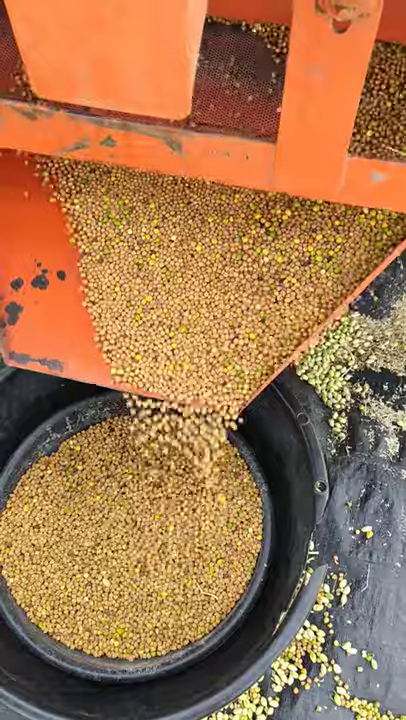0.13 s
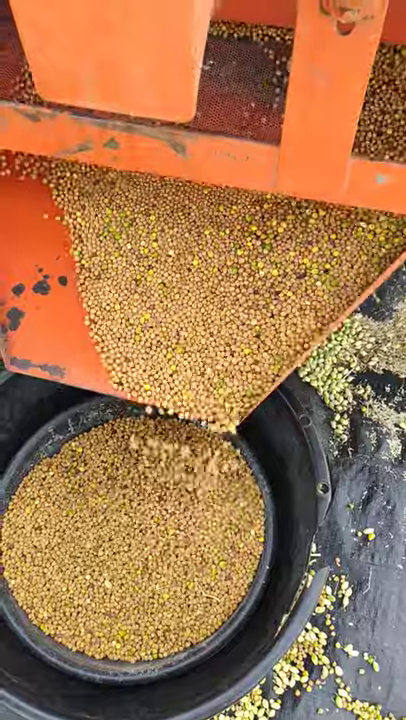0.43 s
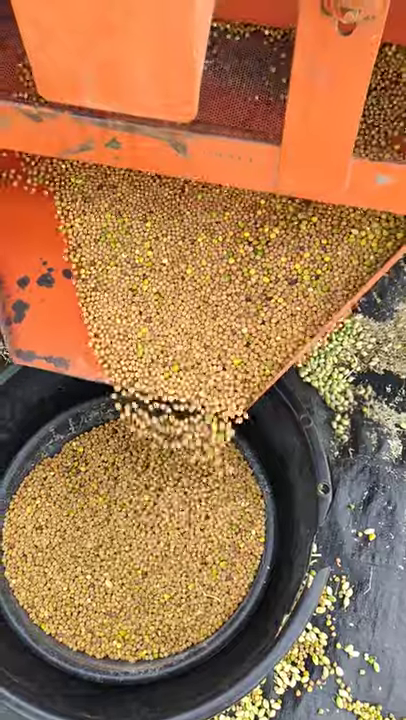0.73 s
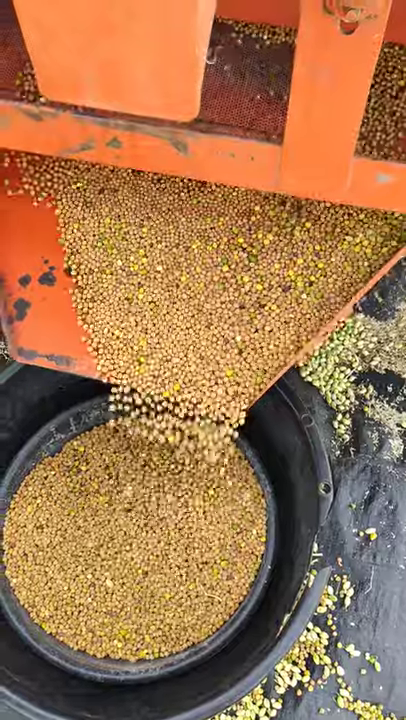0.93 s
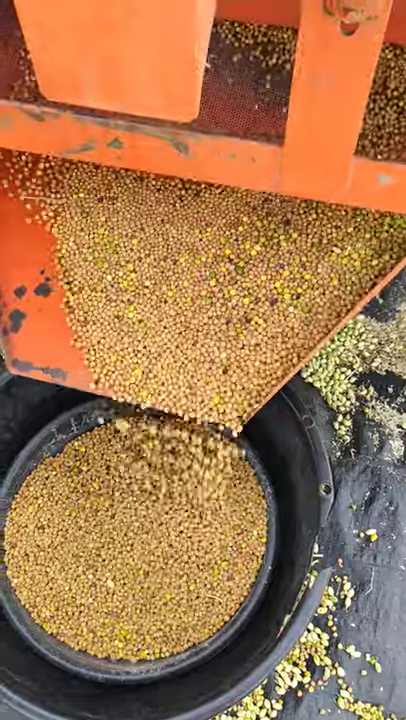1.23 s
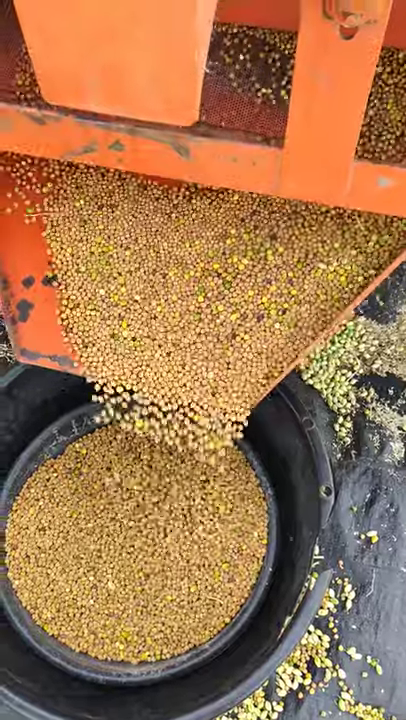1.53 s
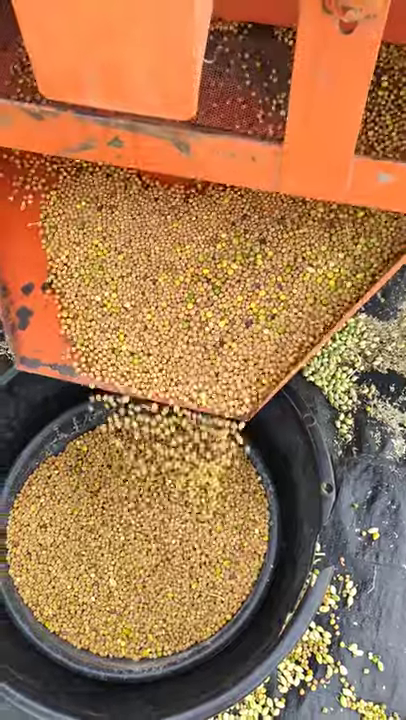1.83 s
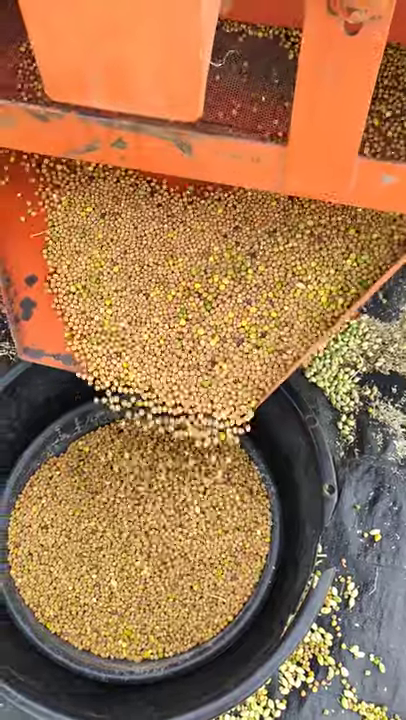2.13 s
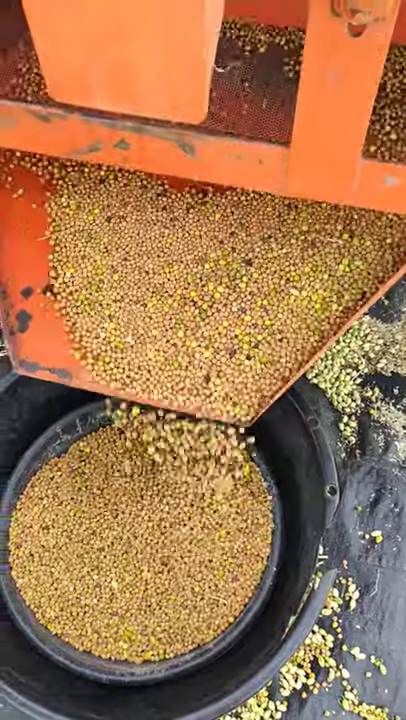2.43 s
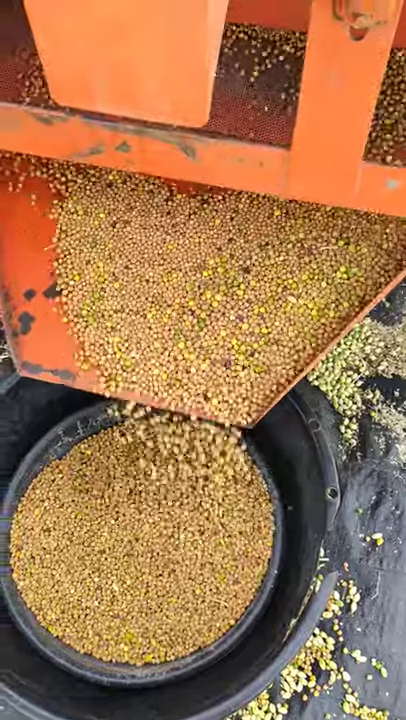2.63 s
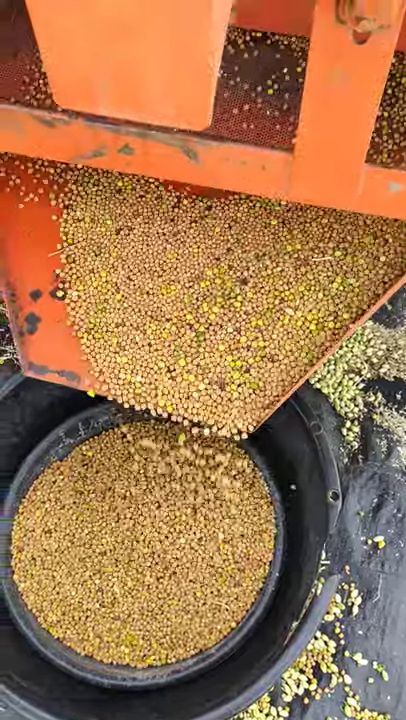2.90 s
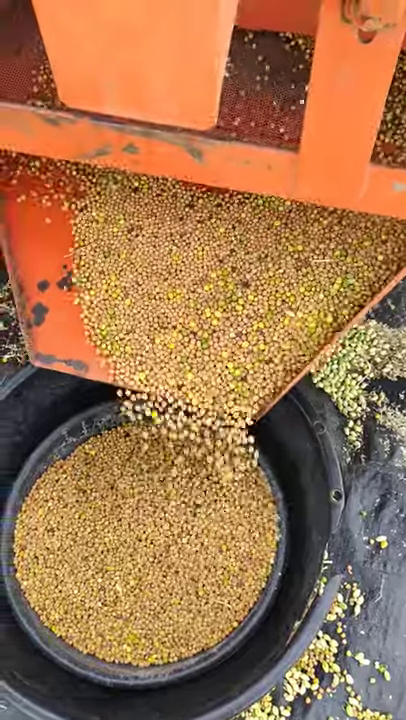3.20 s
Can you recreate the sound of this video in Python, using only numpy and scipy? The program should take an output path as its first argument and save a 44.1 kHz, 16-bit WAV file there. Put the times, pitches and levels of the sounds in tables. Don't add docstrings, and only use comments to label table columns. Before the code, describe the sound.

A grain thresher roars and throbs close by while dried seeds hiss and rattle into a tub.

```python
import sys
import numpy as np
from scipy import signal
from scipy.fft import rfft, irfft
from scipy.io import wavfile

SR = 44100
rng = np.random.default_rng(int(sys.argv[2]) if len(sys.argv) > 2 else 0)


def boost(x):
    u = np.asarray(x, float) / 20
    return 10 ** u


def digitize_waveform(pressure):
    field = np.atleast_2d(pressure).T
    bounded = np.clip(field, -1, 1)
    quanta = np.round(bounded * 32767).astype(np.int16)
    wavfile.write(sys.argv[1], SR, quanta)


N = 148176


def curve(rows):
    return np.interp(np.arange(N) / SR, *np.transpose(rows))


def at_hz(points, hz):
    table_hz, values = np.array(points).T
    return np.interp(np.log(np.maximum(hz, 1)), np.log(table_hz), values)


def rms_one(x):
    return x / np.sqrt(np.mean(x ** 2) + 1e-20)


def drift(rate_hz):
    pole = np.exp(-80 * np.pi * rate_hz / SR)
    noise = rng.standard_normal(N // 40 + 2002)
    slow = signal.lfilter([1], [1, -2 * pole, pole * pole], noise)[2000:]
    return np.interp(np.arange(N) / 40, np.arange(len(slow)), rms_one(slow - slow.mean()))


def pan(db):
    return boost(db * np.array([[0.5], [-0.5]]))


def bands(hz, spectra, gain_for):
    place = 2 * np.log2(np.maximum(hz, 1) / 30)
    out = 0
    for k in range(20):
        band = irfft(spectra * np.clip(1 - abs(place - k), 0, 1), N)
        out = out + gain_for(30 * 2 ** (k / 2)) * band
    return out


# pitch_hz, likeness [0-1]
PORT_LIKENESS = [(30, .92), (70, 1), (300, 1), (450, 1), (800, 0.68), (1300, 0.31), (2300, .3), (6000, 0)]
# pitch_hz, lag_ms
LEFT_PORT_LAG = [(60, 0.18), (250, 0.2), (450, 0.6), (700, 0.53), (1300, 0.35), (2300, 0.452)]


def ports(direct, scattered):
    hz = np.arange(N // 2 + 1) * SR / N
    alike = np.clip(at_hz(PORT_LIKENESS, hz), 0, 1)
    lead = np.exp(2j * np.pi * hz * at_hz(LEFT_PORT_LAG, hz) / 1000)
    left = rfft(direct)
    right = alike * lead * left + np.sqrt(1 - alike ** 2) * rfft(scattered)
    return hz, np.array([left, right])


# start_s, pitch_hz
ENGINE_SPEED = [
    (0.3, 364.6),
    (1.5, 364.3),
    (3.36, 363.8),
]


def crank():
    firing_s = 1.6515
    turns = np.cumsum(curve(ENGINE_SPEED) / 12) / SR
    return turns - turns[int(firing_s * SR)] % 1


FAN_ORDER_LEVELS = [
    -57,
    -36,
]


def fan():
    shaft_hz = 39.7
    turns = np.cumsum(shaft_hz * (1 + 0.0028 * drift(2.6))) / SR
    out = 0
    for order, level_db in enumerate(FAN_ORDER_LEVELS, 1):
        level = boost(level_db + 2.0 * drift(3.6))
        out = out + np.sqrt(2) * level * np.sin(2 * np.pi * order * turns)
    return out


# order [multiple of firing rate], level_db, left_right_db
ENGINE_ORDERS = [(4, -34, 1), (6, -28.5, 2.5), (9, -25.5, -0.5), (10, -34, 0), (12, -22.5, 4),
                 (14, -37.5, 9), (19, -29.5, -11), (20, -30, -3.5), (22, -27.5, -2), (24, -46, -16),
                 (27, -38.5, 3)]


def engine(turns):
    firing_hz, flutter_db, flutter_hz = 30.37, 2.5, 5.2
    out = np.zeros((2, N))
    for order, level_db, pan_db in ENGINE_ORDERS:
        order_hz = order * firing_hz
        lag_turns = order_hz * at_hz(LEFT_PORT_LAG, order_hz) / 1000
        lag = np.array([[-lag_turns], [0]])
        level = boost(level_db + flutter_db * drift(flutter_hz)) * pan(pan_db)
        out += np.sqrt(2) * level * np.sin(2 * np.pi * (order * turns + lag + rng.random()))
    return out


def throb(turns):
    kick_depth, recoil_depth, spread_db, decay_turns = 1.08, 0.84, 2, 0.23
    halves = np.floor(2 * turns + 2).astype(int)
    size = boost(spread_db * rng.standard_normal(N // 100))[halves]
    kick = np.where(halves % 2, recoil_depth, kick_depth) * size
    since_kick_turns = (2 * turns % 1) / 2
    return 1 + kick * np.exp(-since_kick_turns / decay_turns)


# pitch_hz, level_db [dB per Hz]
LEFT_ROAR = [(40, -28), (90, -15), (180, -5), (370, -1), (420, -9), (700, -5), (1150, -20), (2200, -27.5)]
RIGHT_ROAR = [(40, -24), (90, -15), (180, -5.5), (350, -5.5), (410, -9.5), (680, -5.5), (1150, -18),
              (2200, -30.5)]
# pitch_hz, width_hz, depth_db
ECHO_GAPS = [
    (288, 18, -6),
    (352, 12, -9),
    (410, 24, -7),
    (900, 25, -4),
]


def roar(turns):
    level_db, patchy_db, low_cut_hz = -15, 0.5, 68
    hz, both = ports(*(throb(turns) * rng.standard_normal((2, N))))
    colour = boost(np.array([at_hz(LEFT_ROAR, hz), at_hz(RIGHT_ROAR, hz)]))
    colour = colour * np.minimum(1, (2200 / (hz + 1)) ** 2)
    colour = colour / np.sqrt(1 + (low_cut_hz / (hz + 1)) ** 6)
    for gap_hz, width_hz, depth_db in ECHO_GAPS:
        colour = colour * boost(depth_db / (1 + (2 * (hz - gap_hz) / width_hz) ** 4))
    noise = bands(hz, both * colour, lambda band_hz: boost(patchy_db * drift(2.3)))
    return boost(level_db) * rms_one(noise)


# pitch_hz, width_hz, level_db, left_right_db
SHEET_PANELS = [(128.3, 12, -32, -4), (194.4, 27, -29, -2.5), (241, 32, -32, 1), (332.8, 18, -24, 5.5),
                (437.6, 5.1, -38.5, 9.5), (541.7, 12, -31, -1), (660, 12, -30.5, 3.5), (681.5, 14, -32, 3),
                (698, 6.1, -38, -7), (743, 7.2, -30.5, -1.5), (794.3, 26, -31.5, -10), (834, 19, -30.5, -5),
                (935, 11, -34, 1.5), (1078, 27, -41, -7)]


def panels():
    hz, both = ports(*rng.standard_normal((2, N)))
    out = np.zeros((2, N))
    for centre_hz, width_hz, level_db, pan_db in SHEET_PANELS:
        ring = irfft(both / (1 + (2 * (hz - centre_hz) / width_hz) ** 2), N)
        out += boost(level_db) * pan(pan_db) * rms_one(ring)
    return out


# pitch_hz, level_db [dB per Hz]
LEFT_SEED = [(900, 5.5), (1700, -7), (2600, 1), (4500, -3.5), (6200, -10.5), (8500, -11), (10000, -5),
             (15500, -13)]
RIGHT_SEED = [(900, -1), (1800, -3), (4500, -6.5), (6000, -11), (7000, -5), (8800, -2), (11000, -9.5),
              (15500, -12.5)]


def patter():
    seeds_per_s, spread_db = 14000, 2
    sizes = boost(spread_db * np.minimum(rng.exponential(1, (2, N)), 5))
    sizes = sizes * rng.choice([-1, 1], (2, N))
    hits = rng.random((2, N)) < seeds_per_s / SR
    hz, both = ports(*(sizes * hits))
    colour = boost(np.array([at_hz(LEFT_SEED, hz), at_hz(RIGHT_SEED, hz)]))
    both = both * colour * np.minimum(1, (hz / 900) ** 2)
    return hz, both / np.std(irfft(both, N))


# start_s, level_db [peak], hold_s, left_right_db
SEED_SURGES = [(0.294, -21, 0.014, -3), (0.358, -12.5, 0.02, 7), (0.502, -13, 0.023, 8),
               (0.654, -15.5, 0.02, 3), (0.85, -19, 0.023, -2), (0.9194, -17, 0.028, 0.1),
               (1.101, -7.5, 0.014, 1), (1.251, -13, 0.017, 0.1), (1.3714, -17, 0.02, 0.1),
               (1.4094, -18.5, 0.014, 0.1), (1.571, -12, 0.018, -2), (1.652, -14.5, 0.02, 0.1),
               (1.7144, -19, 0.018, 2), (1.8294, -17, 0.012, 2), (1.919, -10.5, 0.018, -1),
               (2.033, -13, 0.018, -1), (2.092, -14, 0.02, 1), (2.157, -15, 0.027, 7),
               (2.258, -11.5, 0.039, -1), (2.308, -8.5, 0.018, 1), (2.416, -15.5, 0.06, 3),
               (2.501, -13, 0.03, 2), (2.6339, -9.5, 0.018, -3.5), (2.731, -11, 0.027, 0.1),
               (2.803, -14, 0.034, 1), (2.885, -8.5, 0.037, 1.5), (2.923, -10, 0.022, -1),
               (3.018, -14.5, 0.023, 1), (3.095, -19, 0.024, 5), (3.265, -11.5, 0.017, -5)]


def surge_power():
    gain_db, attack_s, release_s = -7.5, 0.0017, 0.022
    t = np.arange(N) / SR
    power = np.zeros((2, N))
    for start_s, level_db, hold_s, pan_db in SEED_SURGES:
        rise = np.clip((t - start_s) / attack_s, 0, 1)
        fall = np.exp(-np.maximum(t - start_s - hold_s, 0) / release_s)
        power += (boost(level_db + gain_db) * pan(pan_db) * rise * fall) ** 2
    return power


# start_s, level_db
SEED_STREAM = [
    (0.4, -28),
    (0.47, -27.5),
    (1.26, -29.5),
    (1.75, -27),
    (2.34, -29.5),
    (2.53, -31),
    (2.86, -28.5),
    (3.36, -29),
]


def seeds():
    stream_gain_db, tilt_db_per_octave, patchy_db = 6.5, 3, 1.1
    surge = surge_power()
    stream = boost(curve(SEED_STREAM) + stream_gain_db)
    shake = drift(27.0)

    def gain(hz):
        bright = boost(tilt_db_per_octave * np.log2(hz / 8000))
        patchy = boost(patchy_db * (0.32 * shake + drift(5.9)))
        return np.sqrt(stream ** 2 + surge * bright ** 2) * patchy

    return bands(*patter(), gain)


# start_s, level_db
DRUM_LOAD = [(0.4, -15), (0.94, -14), (0.96, -15.5), (1.94, -14.5), (2.12, -20), (2.16, -12), (2.34, -17),
             (2.53, -14.5), (2.63, -19.5), (2.79, -15), (2.81, -17.5), (3.14, -13.5), (3.15, -16.5),
             (3.36, -15)]


def scene():
    load_share = 0.66
    turns, load_db = crank(), curve(DRUM_LOAD)
    machine = fan() + engine(turns) + roar(turns) + panels()
    return boost(load_share * (load_db - load_db.mean())) * machine + seeds()


def top_cut(x):
    return signal.sosfilt(signal.butter(12, 16310, fs=SR, output="sos"), x)


def record(dry):
    start_s, fade_from_db, fade_s = 0.1724, -17, 0.17
    top, top_cut_hz, rumble_cut_hz = 0.95, 15510, 22
    bass_late_hz, bass_late_s = 170, 0.076
    t = np.arange(N) / SR - start_s
    hz = np.arange(N // 2 + 1) * SR / N
    rounded = top * np.tanh(dry / top)
    cut = rfft(rounded) * (hz < top_cut_hz) / (1 + (rumble_cut_hz / (hz + 1)) ** 4)
    bass = irfft(cut / (1 + (hz / bass_late_hz) ** 4), N)
    late = irfft(cut, N) - np.exp(-np.maximum(t, 0) / bass_late_s) * bass
    fade = (t > 0) * np.clip(boost(fade_from_db) + t / fade_s, 0, 1)
    return top_cut(late * fade)


dry = scene()
out = record(dry)
digitize_waveform(out)
```